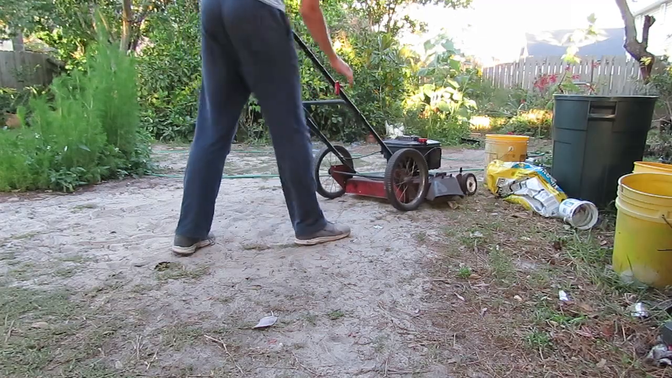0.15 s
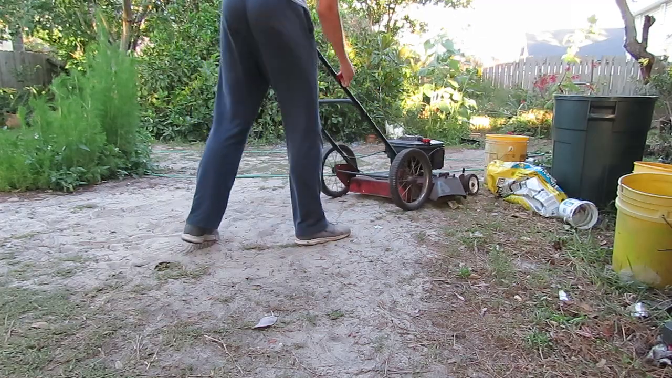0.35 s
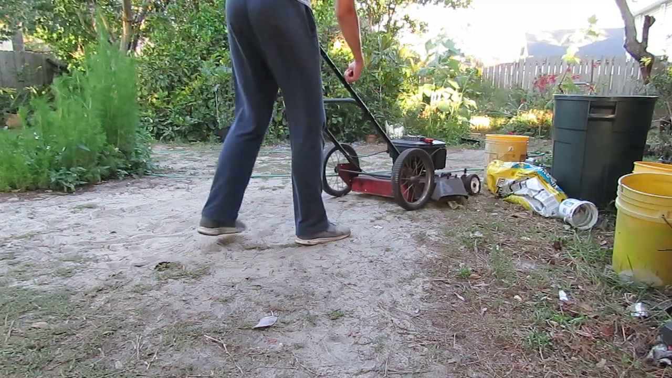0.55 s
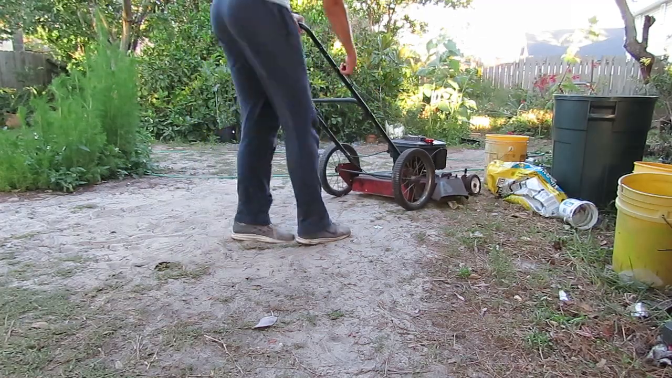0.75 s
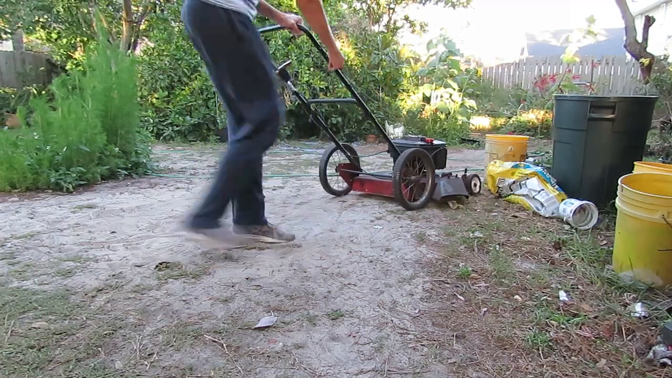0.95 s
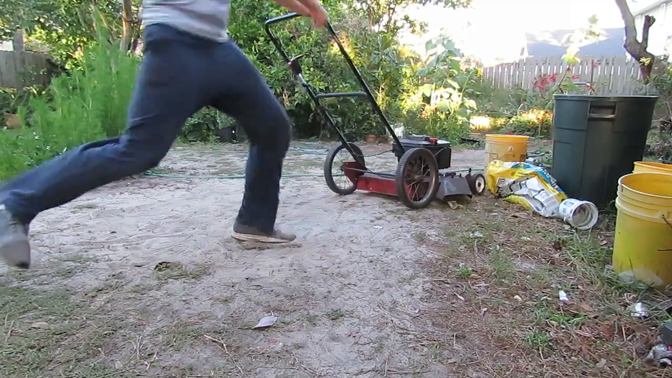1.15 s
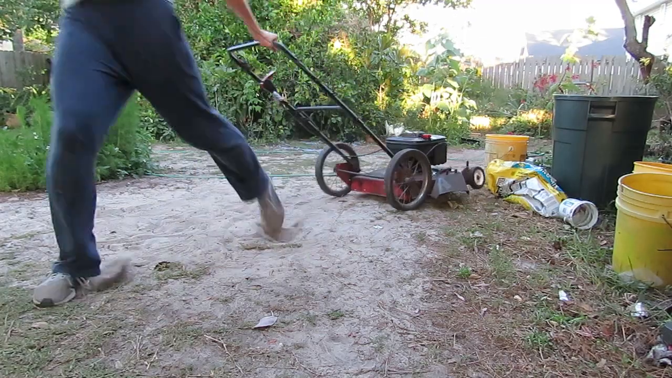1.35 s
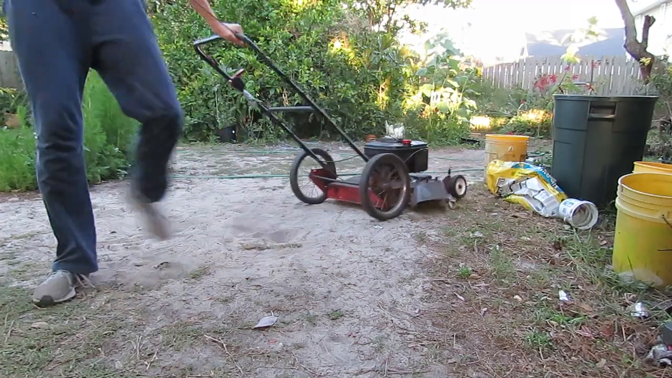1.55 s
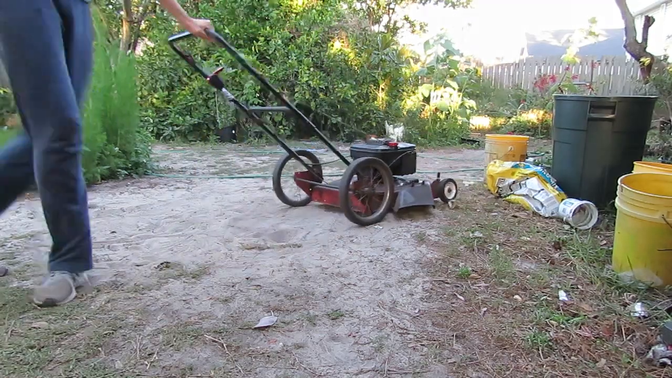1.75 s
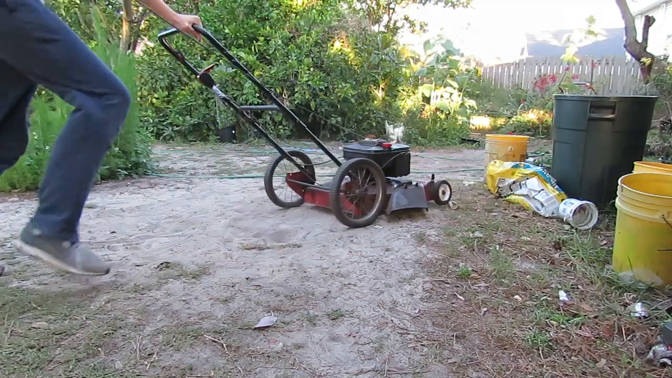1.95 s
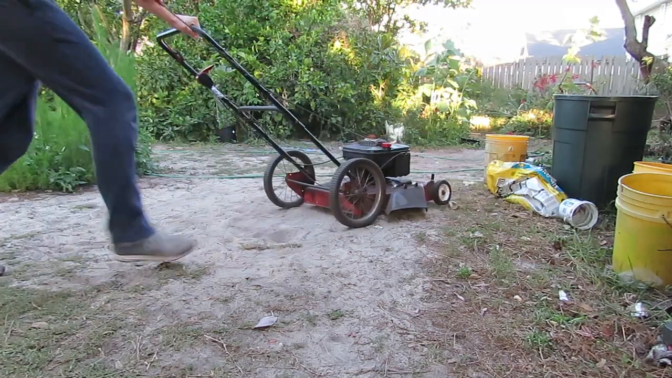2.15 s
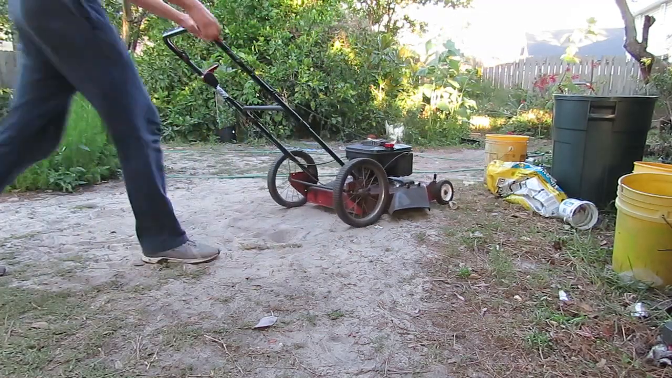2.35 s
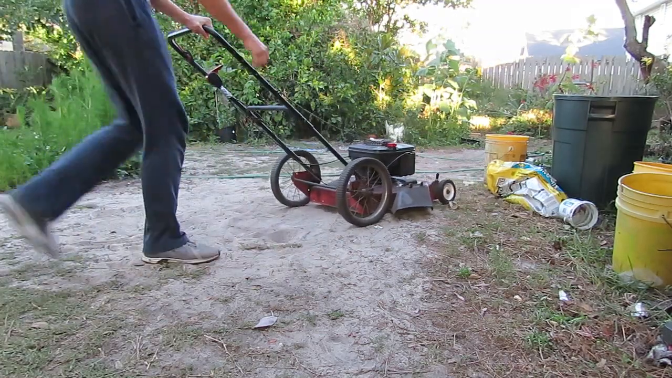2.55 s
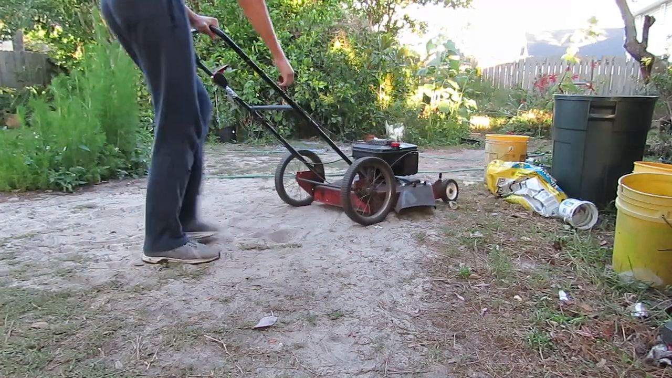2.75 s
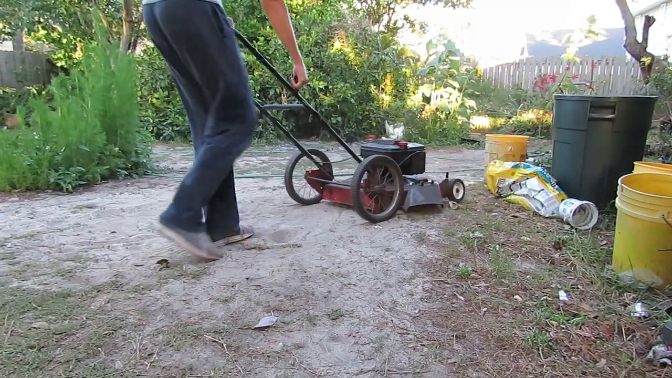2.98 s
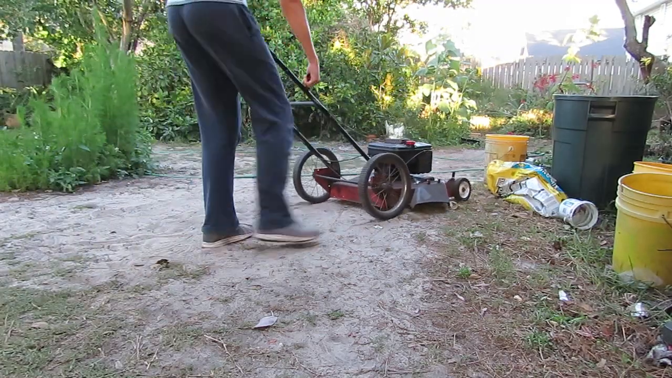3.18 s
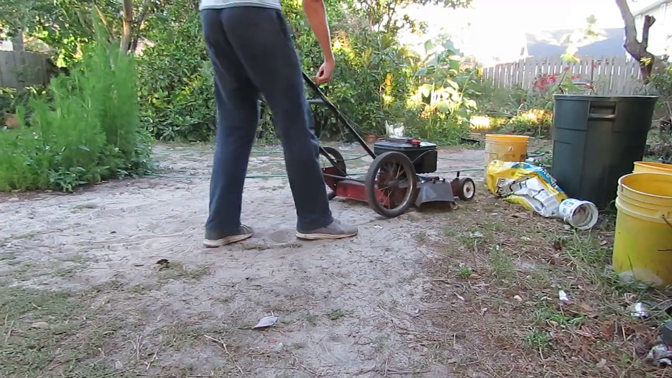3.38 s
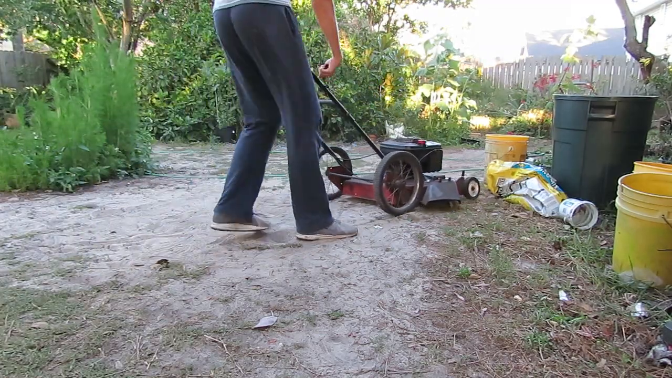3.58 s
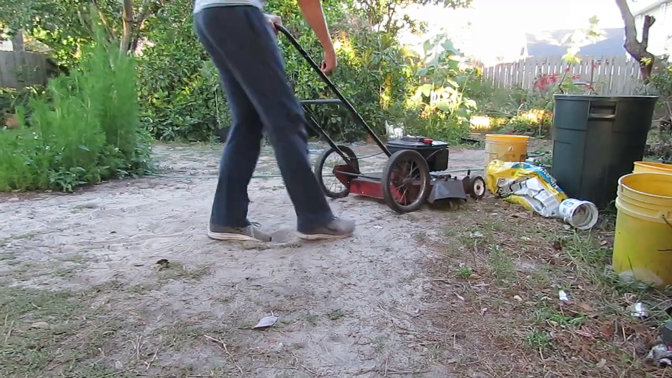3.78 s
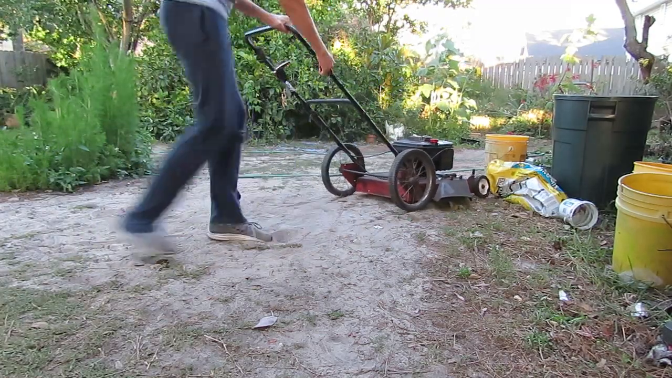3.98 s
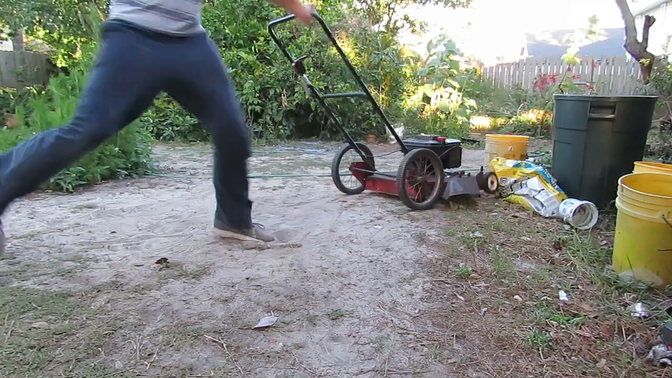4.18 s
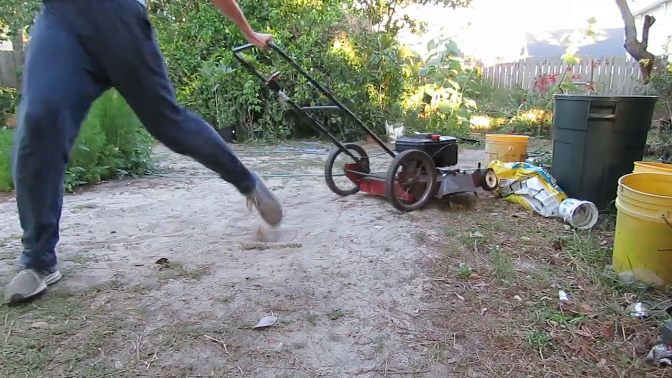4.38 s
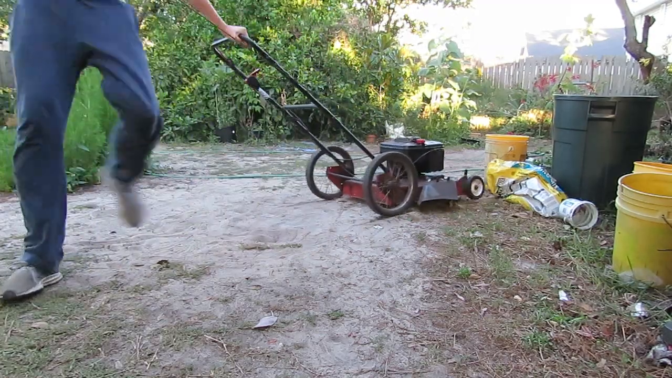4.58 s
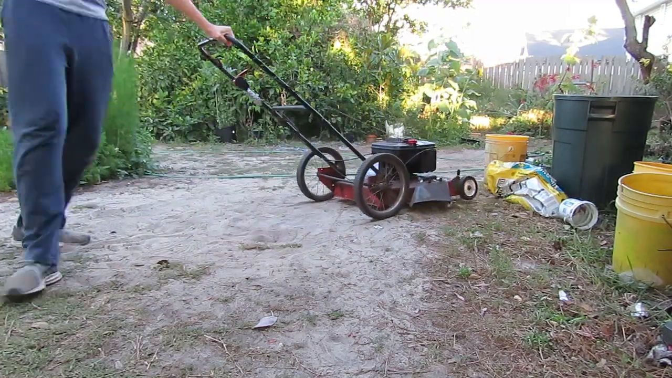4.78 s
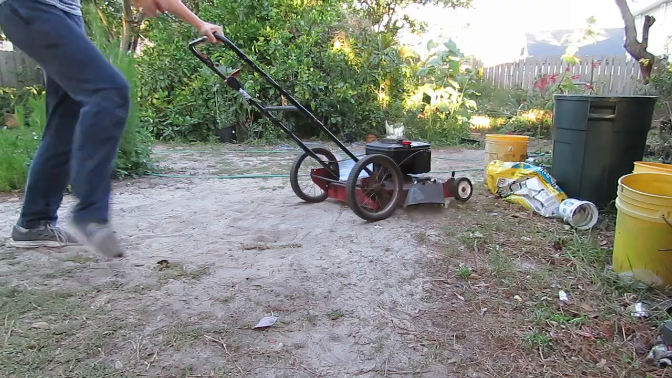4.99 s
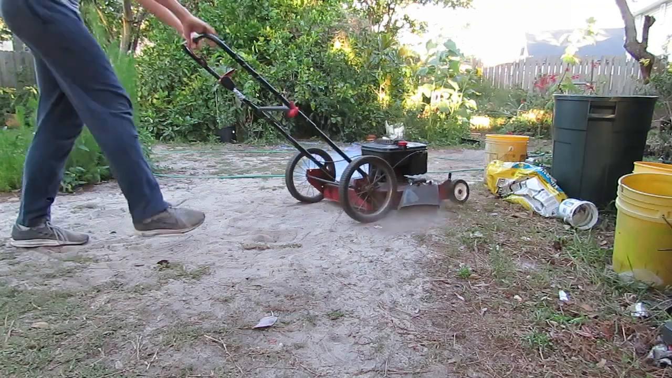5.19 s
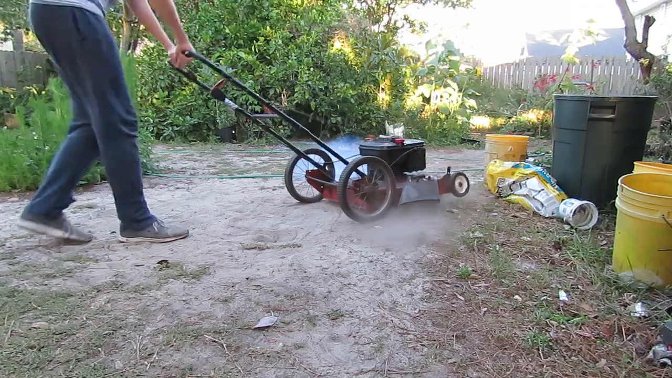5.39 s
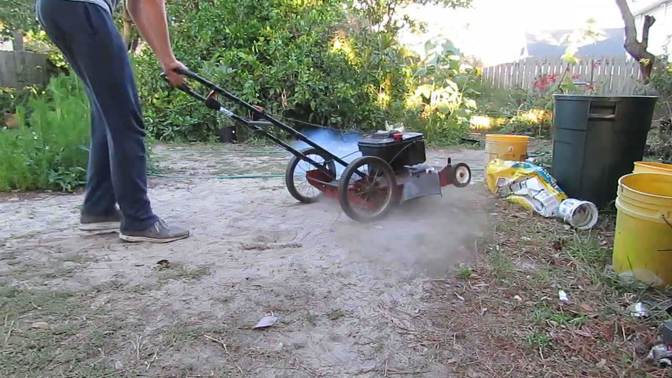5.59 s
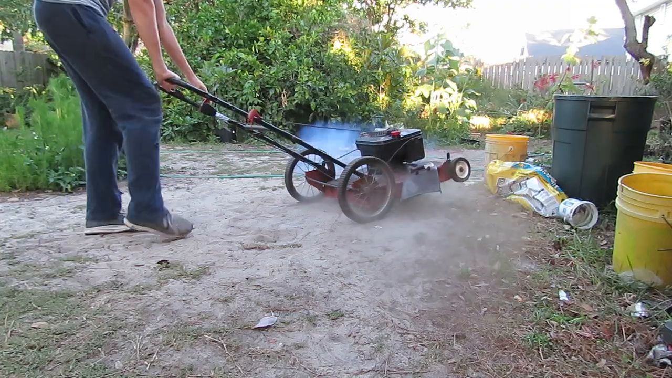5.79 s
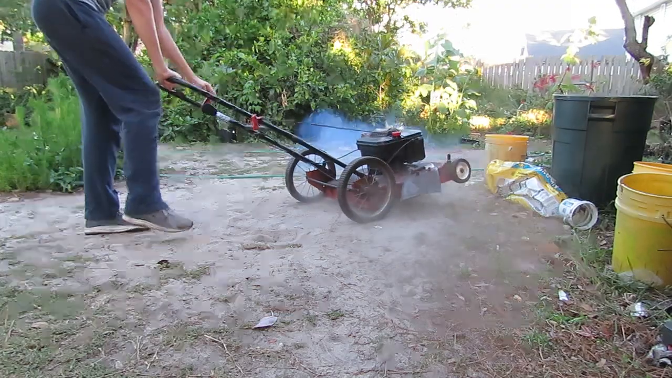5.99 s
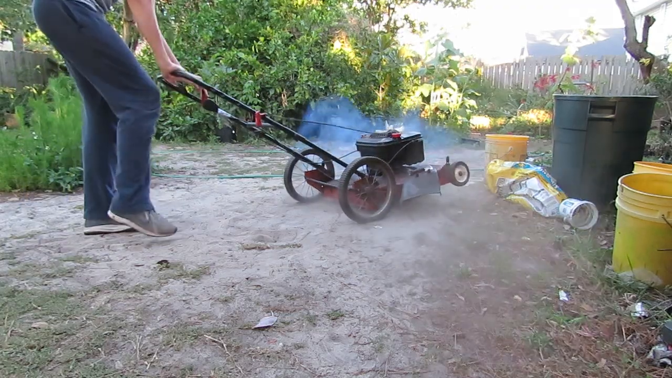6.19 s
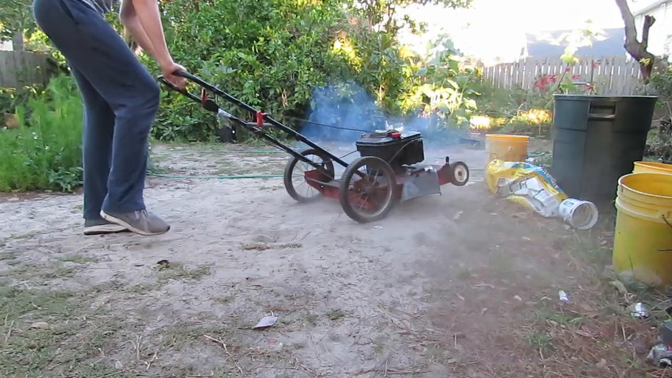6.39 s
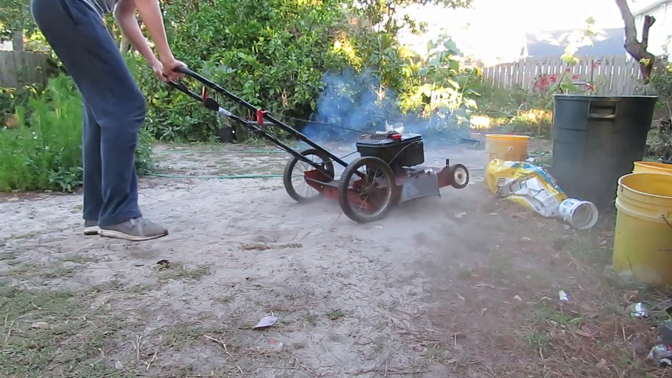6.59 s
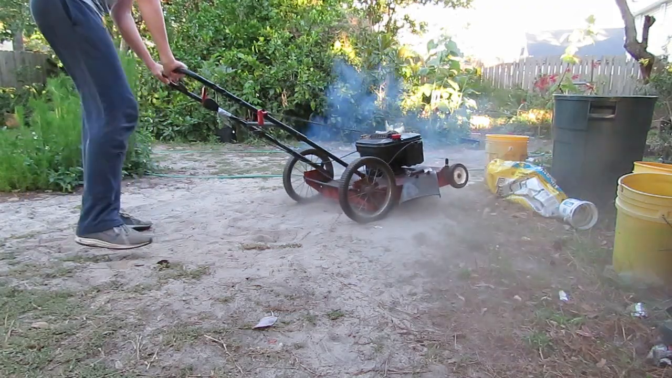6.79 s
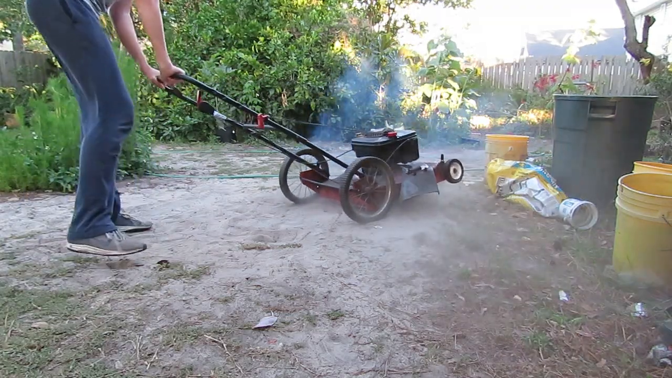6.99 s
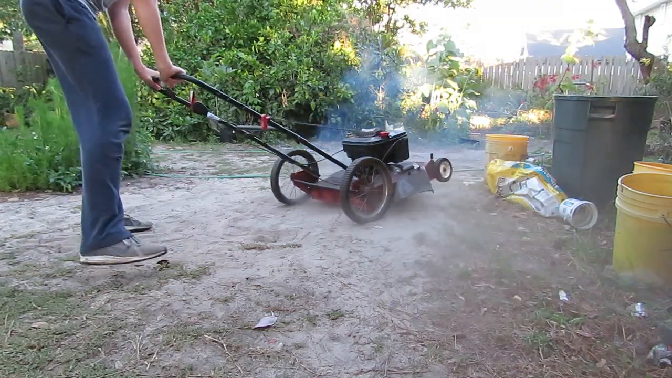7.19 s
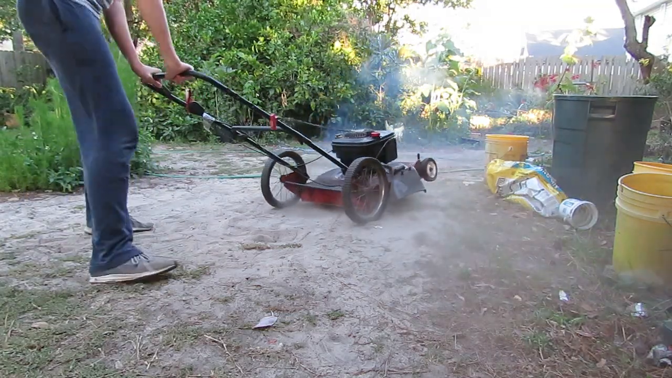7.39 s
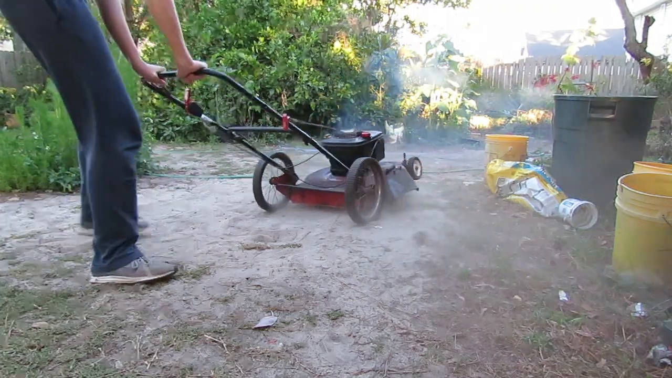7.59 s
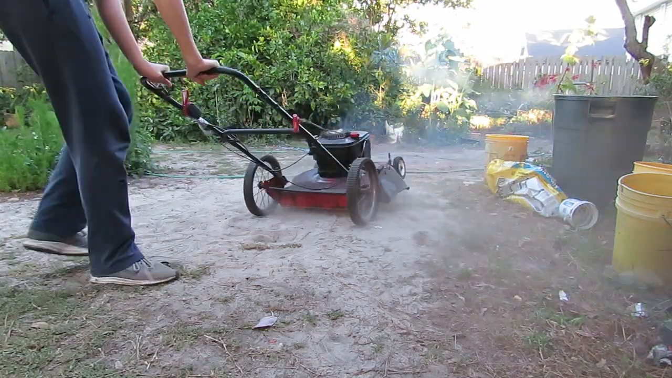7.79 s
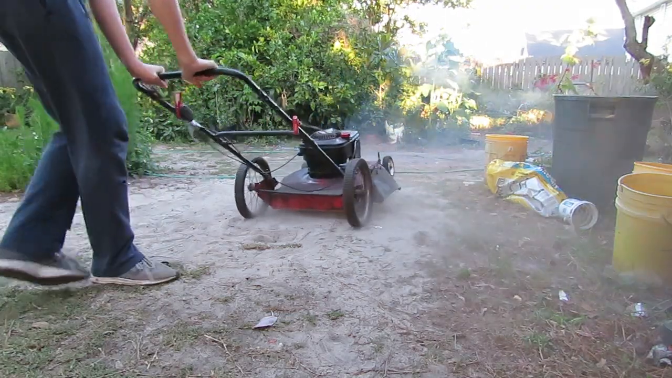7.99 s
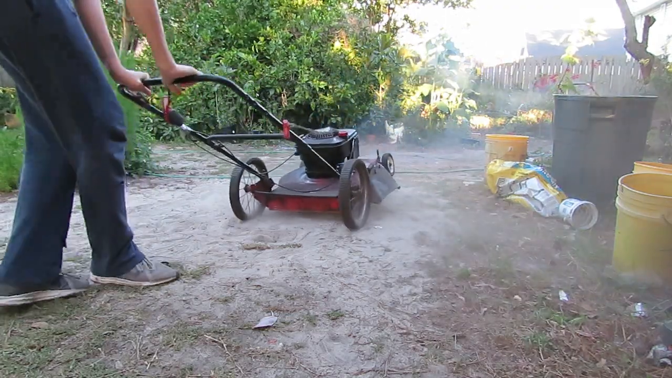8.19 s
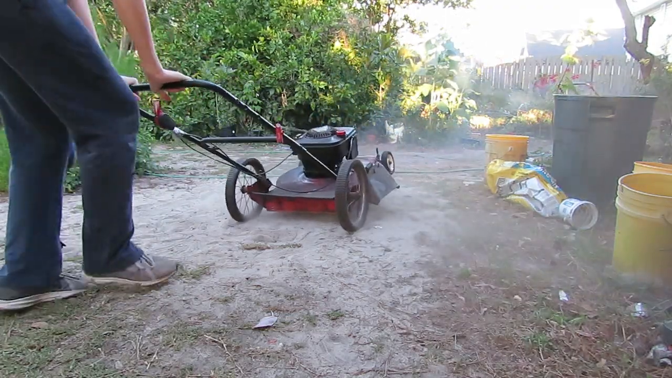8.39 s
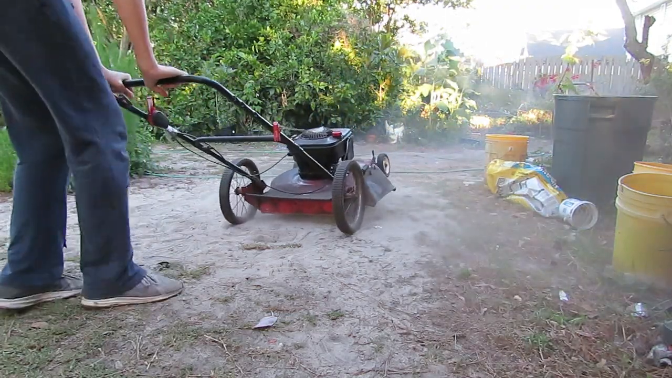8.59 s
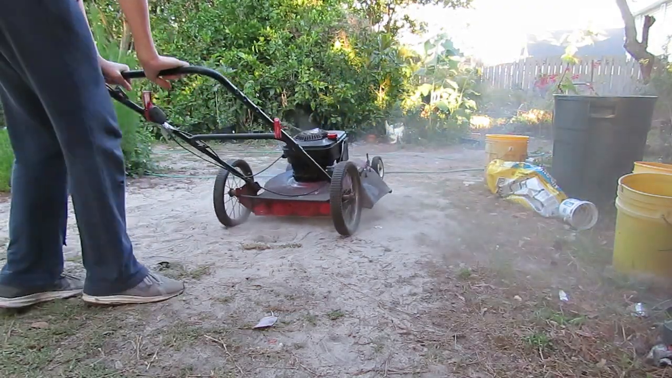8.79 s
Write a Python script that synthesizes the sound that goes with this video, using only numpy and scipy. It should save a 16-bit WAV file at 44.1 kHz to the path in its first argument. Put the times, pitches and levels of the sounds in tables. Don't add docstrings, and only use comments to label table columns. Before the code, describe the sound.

A person starts an old push mower on hard soil. The first cord pull clatters and lurches, squeaks, then winds back with ratchety rattling and loose metal slaps. After a quiet gap with handle knocks, the second pull fires the engine, slow coughing beats rushing into a harsh, steady motor roar with exhaust crackle and airy hiss. A microphone a few steps away catches dry garden sound with short reflections.

```python
import sys
import numpy as np
from scipy import signal
from scipy.fft import rfft, irfft, next_fast_len
from scipy.io import wavfile
from scipy.ndimage import uniform_filter1d

SR = 44100
rng = np.random.default_rng(int(sys.argv[2]) if len(sys.argv) > 2 else 0)


def level_to_linear(level):
    exponent = np.asarray(level, float) / 20
    return 10 ** exponent


def file_out(sig):
    cols = np.atleast_2d(sig).T
    lim = np.clip(cols, -1, 1)
    pcm = np.round(lim * 32767).astype(np.int16)
    wavfile.write(sys.argv[1], SR, pcm)


N = 390285
T = np.arange(N) / SR
CYCLE_HZ = 27.1

# (time [s], firing rate [1/s])
FIRING_RATE = [(4.74, 10.44), (4.95, 15.49), (5.2, 22.39), (5.5, 28.54), (5.65, 26.7), (5.8, 26.74),
               (6.2, 26.36), (6.6, 27.2), (7.4, 27.06), (7.75, 26.99), (8.1, 27.12), (8.85, 27.31)]
# (firing count [1], level [dB])
MISFIRES = [
    (15, -13),
    (20, -6),
    (22, -10),
]
# (time [s], load [dB], throttle opening [0-1], outlet turned away [0-1])
RUNNING = [(4.7, -1, 0.95, 0.3), (4.9, 6.5, 0, 0), (5.1, 2, 1, 0.23), (5.46, -0.5, 0.7, 0),
           (5.52, 0, 0.06, 0.2), (5.75, 2, 0, 0.08), (5.95, 0, 0.58, 0.15), (6.2, 1.5, 0.05, 0.27),
           (6.55, 2, 0.07, 0.2), (7.2, 1, 0, 0.2), (7.6, 2, 0.14, 0.57), (8.1, 1, 0, 0.46),
           (8.45, 3, 0, 0.51), (8.85, 2.5, 0, 0.63)]
# (level at rest [dB], share of load [1], change at full throttle [dB],
# change at half speed [dB], change when turned away [dB])
THUMP_LAW = (-23.5, 0.25, 2.2, -1.5, 2.4)
BASS_LAW = (8.5, -0.1, 3.5, 12, -16.5)
CRACK_LAW = (-39, 0.2, 8.5, -4.5, -11.5)
SHELL_LAW = (-7.5, 0.3, -4.5, 10.5, 7.5)
ROAR_LAW = (-24, 1, -0.5, -9.5, -0.5)
HISS_LAW = (-31.5, 1, 5.5, -5, -5.5)
DRUM_LAW = (-28.5, 1, 3.7, -4, -14)
# (multiple of the settled cycle [1], level [dB])
MUFFLER_VOICE = [(1, -37), (2, -8.5), (3, -13), (4, -7.5), (5, 2), (6, -2.5), (7, 5), (8, 1.5), (9, -1),
                 (10, 4), (11, -1), (12, -4.5), (13, -4.5), (14, -18), (15, -10.5), (16, -5.5), (20, -11.5)]
# (multiple of the cycle [1], level [dB])
BLADE_TONES = [(4, -42), (12, -38), (16, -32.5), (20, -39), (25, -43), (30, -44), (36, -46)]
# (loss at start, at end [dB])
BLADE_FADE = (7.9, 8.3), (0, 8)
# (frequency [Hz], level [dB])
CRACK_SPECTRUM = [(2000, -15), (4000, -9), (5500, -12), (7500, -11), (9300, -17.5), (11200, -5),
                  (13000, -17), (16000, -23)]
# (frequency [Hz], width [Hz], level [dB])
SHELL_MODES = [(860, 260, 12), (1720, 400, 17), (2360, 230, 16), (2980, 660, -28), (5000, 1100, -42)]
# (frequency [Hz], width [Hz], level [dB])
SHIELD_MODES = [(1460, 35, 3), (2720, 300, -18), (3240, 110, -4), (4430, 200, -3), (5230, 130, -4.5),
                (6780, 110, -11.5)]
# (frequency [Hz], density [dB per Hz])
ROAR_SPECTRUM = [(60, -42), (150, -15), (250, -11), (320, -5), (370, -9), (430, -2), (570, -7), (950, -2),
                 (1300, -3), (2000, -8), (2800, -18), (4000, -32), (8000, -70)]
# (frequency [Hz], density [dB per Hz])
HISS_SPECTRUM = [(880, -6.5), (1500, -7), (1960, 3.5), (2740, -2), (3310, 0.5), (8230, -14), (10900, -18),
                 (14300, -22), (15400, -29), (16000, -90)]

# (time [s], deck shaking [dB], cord rubbing [dB])
CORD_MOVES = [
    [(.85, -47.5, -62), (1.03, -39, -62), (1.1, -42, -76), (1.12, -38.5, -41), (1.22, -35, -58)],
    [(1.22, -40, -52), (1.32, -26.5, -41), (1.45, -18.5, -30), (1.58, -22, -33), (1.75, -27, -38.5),
     (1.92, -33.5, -38)],
    [(1.92, -31, -38), (2.04, -33.5, -37.5), (2.4, -36, -36.5), (2.54, -38.5, -43), (2.59, -41, -37),
     (2.68, -40, -55), (2.85, -59, -67)],
    [(4.17, -53, -60), (4.3, -30, -46), (4.44, -15, -30), (4.59, -24, -44), (4.69, -17.5, -32),
     (4.8, -31, -41), (4.85, -23, -36)],
]
# (time [s], level [dB], boom over rattle [dB], relative rasp [dB])
LURCHES = [(1.25, -37, 13, -22), (1.38, -20, -4, -13), (1.53, -17, -2.5, -24), (1.64, -20, 3, -24),
           (2.01, -27, 0, -12), (2.26, -25.5, -1, -21), (2.72, -50, 17, -17), (4.258, -31, 10.5, -13),
           (4.362, -20, -14, -11), (4.506, -21.5, 4.5, -3.5), (4.634, -17, 0.5, -13.5),
           (4.736, -18.5, -0.5, -23)]
# (time [s], turns [1])
PULLEY_TURNS = [(1.71, 0), (1.935, 5), (2.04, 6), (2.16, 8), (2.32, 10), (2.52, 12), (2.67, 13)]
# (frequency [Hz], width [Hz], level [dB])
DECK_MODES = [(219.5, 14, 0), (318, 27, 4.5), (450, 50, 14), (635, 117, 8.5), (910, 170, 4),
              (1300, 360, -17), (1690, 290, -11), (2320, 440, -41)]
# (frequency [Hz], density [dB per Hz])
RASP_SPECTRUM = [(1180, 2), (2000, -9), (3200, -9), (6700, -4.5), (8850, -17), (10300, -13.5), (11200, -21),
                 (13400, -16), (15300, -29), (16000, -61)]

# (time [s], level [dB], relative bright tick [dB],
# t60 [s])
LATCH_AND_HANDLE_KNOCKS = [(0.399, -34.5, -8.5, 0.33), (1.115, -42, 5.5, 0.26), (1.231, -21.5, -2.5, 0.22),
                           (1.253, -18.5, 0.5, 0.15), (2.799, -37, -4, 0.11), (2.983, -41, 2, 0.099),
                           (3.174, -36, -17, 0.22), (3.343, -25, -31, 0.33), (3.461, -17.5, -10, 0.28),
                           (3.741, -40.5, 0, 0.14), (4.096, -35.5, -0.5, 0.26), (4.171, -41, 4.5, 0.12),
                           (4.193, -20, -12.5, 0.58)]
# (time [s], level [dB], relative bright tick [dB], t60 [s])
CLANKS = [(1.337, -26, -10, .15), (1.377, -14, -15, 0.17), (1.654, -16, -24, .1), (4.323, -26, -7, 0.096),
          (4.44, -15, -25, .1), (4.471, -12, -10, .15), (4.595, -20, -23, 0.14), (1.407, -8, -13, 0.17),
          (1.619, -3.5, -15.5, 0.09), (1.776, -22, -12.5, 0.19), (1.802, -19.5, -16, 0.24),
          (1.964, -21, -6.5, 0.081), (1.995, -13.5, -25, 0.18), (2.173, -17, -20, 0.039),
          (2.212, -21.5, -11, 0.17), (2.25, -13, -30, 0.11), (2.707, -19.5, -47, 0.23),
          (2.73, -23, -36, 0.14), (4.229, -18, -8, 0.26), (4.252, -16, -5, 0.21), (4.341, -12, -23, 0.2),
          (4.426, -15.5, -6, 0.11), (4.61, -9, -13, 0.15), (4.708, -16.5, -6, 0.24)]
# (time [s], level [dB], relative bright tick [dB], t60 [s])
BUMPS = [(0.848, -31, -26, 0.087), (1.025, -40, -16, 0.17), (1.359, -27, -1, 0.2), (1.526, -20.5, 4, 0.16),
         (2.542, -35, -12, 0.16), (3.726, -40, -7, 0.13), (4.372, -21, -27, 0.22), (4.636, -13, -9, 0.16)]
# (frequency [Hz], level [dB], t60 [s])
FRAME_MODES = [(232, -0.5, 0.13), (285, -5, 0.21), (430, -19, 0.18), (595, -8, 0.35), (842, -5, 0.24),
               (984, 0.5, 0.098), (1220, 6, 0.016), (1553, -3, 0.063), (1732, -5, 0.059),
               (2230, -33, 0.029), (2510, -4, 0.048), (4860, -17, 0.019)]

# (time [s], level [dB])
PAWL_BITES = [
    (1.2535, -11),
    (4.252, -10),
]
# (frequency [Hz], level [dB], t60 [s])
PAWL_MODES = [(2800, -4, .015), (7400, -1, .005), (8700, 0, .005), (9800, 1, .005), (11200, -1, .004),
              (13000, -5, .004)]
# (time [s], level [dB])
HANDLE_DROPS = [
    (3.343, -27),
    (3.463, -29),
]
# (frequency [Hz], level [dB], t60 [s])
HANDLE_MODES = [(409, -4, .22), (614, -4, .13), (1150, -4, .15)]
# (time [s], level [dB])
BRACKET_KNOCKS = [
    (3.462, -27),
]
# (frequency [Hz], level [dB], t60 [s])
BRACKET_MODES = [(1790, 0, .08), (2680, -4, .07), (3600, -9, .05), (4900, -8, .05), (6100, -14, .04)]
# (time [s], level [dB])
HOUSING_CATCHES = [
    (1.254, -18),
    (4.253, -24),
]
# (frequency [Hz], level [dB], t60 [s])
HOUSING_MODES = [(2290, -5, .1), (2950, 0, .07), (3700, -8, .03)]
# (time [s], level [dB])
SKIRT_SLAPS = [
    (1.996, -13),
    (2.25, -15),
    (2.708, -20),
]
# (frequency [Hz], level [dB], t60 [s])
SKIRT_MODES = [(720, -5, .09), (990, 0, .1), (1600, -9, .04), (1900, -10, .04)]
# (time [s], level [dB])
PAN_BOOMS = [
    (1.24, -26),
    (1.362, -19),
    (1.505, -21),
    (2.016, -24),
    (2.287, -25),
    (4.63, -19),
]
# (frequency [Hz], level [dB], t60 [s])
PAN_MODES = [(205, 0, .2), (290, -7, .12)]

# (start [s], end [s], frequency [Hz], level [dB])
SQUEAKS = [(.4, 0.436, 6750, -53), (1.02, 1.06, 6950, -54), (1.03, 1.05, 9090, -57), (.4, .43, 8800, -60),
           (1.157, 1.19, 10535, -52), (1.95, 2.1, 10535, -64), (1.327, 1.364, 10600, -44),
           (1.43, 1.56, 10535, -58), (1.454, 1.637, 7000, -45), (1.563, 1.686, 3430, -36.5),
           (1.788, 1.95, 10500, -56), (4.197, 4.22, 10400, -36), (4.33, 4.37, 10535, -43),
           (4.472, 4.578, 3410, -36), (4.46, 4.593, 6920, -44), (4.48, 4.515, 9090, -47),
           (4.483, 4.53, 10535, -42), (4.53, 4.58, 10535, -50), (4.7, 4.84, 10535, -52),
           (4.84, 4.97, 10535, -56), (4.97, 8.853, 10535, -59)]
# (time [s], level [dB])
SOIL_THUDS = [(.43, -45), (1.36, -30), (1.83, -35), (2.03, -40), (2.3, -40), (3.09, -51), (4.37, -37),
              (4.5, -33), (4.64, -27)]
# (frequency [Hz], density [dB per Hz])
YARD_SPECTRUM = [(15, -62), (25, -17), (117, -8.5), (263, -9), (285, -8), (624, -7.5), (862, -6),
                 (1040, -10), (1520, -13.5), (2050, -21), (2610, -23.5), (6730, -38.5), (11900, -48),
                 (16000, -51)]
# (frequency [Hz], side minus mid [dB])
STEREO_WIDTH = [(40, -71), (120, -89), (250, -26), (500, -17.5), (1000, -18.5), (2000, -14), (4000, -12),
                (8000, -2), (11000, -5.5), (14000, 0.5)]


def engine():
    s, per_s = np.transpose(FIRING_RATE)
    rate = np.interp(T, s, per_s)
    started = T >= s[0]
    phase = np.where(started, np.cumsum(rate * started) / SR, -1)
    thump, bass, crack, shell, roar, hiss, drumming = layer_gains(rate)
    fired = np.flatnonzero(np.diff(np.floor(phase)) == 1)
    first = fired[0]
    luck = rng.standard_normal((len(fired), 2))
    miss_db = np.zeros(len(fired))
    for count, db in MISFIRES:
        miss_db[round(count)] = db
    blows, spits = np.zeros(N), np.zeros(N)
    blows[fired] = level_to_linear(1.4 * luck[:, 0] + miss_db)
    spits[fired] = level_to_linear(1.8 * np.clip(luck[:, 1], -2, .8) + .8 * miss_db)

    thumps = muffler_thumps(blows, bass)
    hum = blade_hum(phase, s[0])
    cracks = exhaust_cracks(phase, spits, shell, len(fired))
    clatter = valve_clatter(phase)
    body = colour(grit(1.2, 2500), ROAR_SPECTRUM) * level_to_linear(1.1 * wander(5.4) + 1.0 * wander(43.0))
    body = body + .5 * clatter / np.std(clatter[first:])
    drum = deck_drumming()
    breath_db = 0.75 * np.cos(2 * np.pi * (phase - .2))
    air = colour(grit(2.7, 5000), HISS_SPECTRUM) * level_to_linear(1.6 * wander(25.) + breath_db)
    return (thump * thumps / np.std(thumps[first:]) + hum + drumming * drum
            + 0.85 * crack * cracks + roar * body + hiss * air)


def layer_gains(rate):
    s, *controls = np.transpose(RUNNING)
    load_db, throttle, away = (np.interp(T, s, c) for c in controls)
    lag = 2 * np.clip(1 - rate / CYCLE_HZ, 0, 1)
    gate = np.clip((T - s[0]) / .02, 0, 1)
    gains = []
    for law in (THUMP_LAW, BASS_LAW, CRACK_LAW, SHELL_LAW, ROAR_LAW, HISS_LAW, DRUM_LAW):
        db, share, open_db, lag_db, away_db = law
        gains.append(gate * level_to_linear(db + share * load_db + open_db * throttle + lag_db * lag + away_db * away))
    return gains


def muffler_thumps(blows, bass):
    hz = np.fft.rfftfreq(8192, 1 / SR)
    voice = [(k * CYCLE_HZ, db) for k, db in MUFFLER_VOICE]
    voice += [(750, -14.0), (1300, -34), (3000, -26), (9000, -90)]
    turn = 2.7 * np.exp(-(hz / 165) ** 2) - .5 + hz / 1500
    wave = np.fft.fftshift(irfft(level_to_linear(read(voice, hz)) * np.exp(1j * turn)))
    thumps = signal.oaconvolve(blows, wave, "same")
    low = signal.sosfiltfilt(signal.butter(1, [68, 125], "bandpass", fs=SR, output="sos"), thumps)
    deep = signal.sosfiltfilt(signal.butter(2, 68, fs=SR, output="sos"), thumps)
    tipped_db = -15 * np.clip((5.8 - T) / .04, 0, 1)
    thumps = thumps + (bass * level_to_linear(0.7 * tipped_db) - 1) * low + (level_to_linear(tipped_db) - 1) * deep
    upper = signal.sosfiltfilt(signal.butter(1, [250, 380], "bandpass", fs=SR, output="sos"), thumps)
    return thumps + (1.14 / (bass + .01) ** 0.76 - 1) * upper * (bass > 0)


def exhaust_cracks(phase, spits, shell, firings):
    u = np.arange(900) / SR
    jet = np.exp(-u / .0019) * np.minimum(u / .0015, 1) * 1.1
    jet = jet + .15 * np.exp(-u / .006) + .42 * np.exp(-((u - .0085) / .0015) ** 2)
    chuff = np.exp(-((u - .005) / .0032) ** 2) + .3 * np.exp(-abs(u - .008) / .006)
    slow = np.clip(1.15 - uniform_filter1d(np.gradient(phase), 3000) * SR / CYCLE_HZ, .12, 1)
    flow = np.roll(signal.oaconvolve(spits, jet)[:N], -45)
    flow = flow + 1.85 * np.roll(signal.oaconvolve(spits * slow, chuff)[:N], -200)
    opened = np.diff(np.floor(phase + 0.17), prepend=0) == 1
    lifts = opened * 6 * slow * level_to_linear(-13.5 + 3.5 * rng.standard_normal(N).clip(-2, 1))
    lifted = signal.oaconvolve(lifts, np.exp(-u / 0.0074))[:N]
    gas = flow * evened(grit(2.5, 6000))
    jolt = gas + 0.98 * lifted * rng.standard_normal(N)
    firing = np.floor(phase + .3).astype(int)
    tint_db = 1.8 * rng.standard_normal((firings + 1, len(SHELL_MODES)))
    shake_db = 4 * rng.standard_normal((firings + 1, len(SHIELD_MODES))).clip(-2, 1.3)
    shell_ring = jolted(jolt, SHELL_MODES, tint_db[firing].T)
    shield = jolted(jolt, SHIELD_MODES, shake_db[firing].T)
    return level_to_linear(1) * evened(shield) + colour(gas, CRACK_SPECTRUM) + shell * level_to_linear(9.0) * evened(shell_ring)


def jolted(jolt, modes, tints_db):
    out = np.zeros(N)
    for (hz, width, db), tint_db in zip(modes, tints_db):
        out += ring(level_to_linear(db + tint_db) * jolt, hz, width) / np.sqrt(width)
    return out


def valve_clatter(phase):
    places, sizes = rng.random(24), rng.standard_normal(24)
    ticks = np.zeros(N)
    for place, size in zip(places, sizes):
        ticks[1:] += size * (np.diff(np.floor(phase - place)) == 1)
    ticks *= 1 + .55 * rng.standard_normal(N)
    ringing = ring(ticks, 880, 200.0) + .5 * ring(ticks, 1480, 310.0) + 0.38 * ring(ticks, 600, 240.0)
    return band(ringing, 400, 2200)


def deck_drumming():
    shake = grit(2.1, 860)
    lower = ring(ring(shake, 297, 75.0), 297, 75.0)
    return evened(lower + ring(ring(shake, 425, 62.0), 425, 62.0))


def blade_hum(phase, start_s):
    turns = uniform_filter1d(phase, 6000)
    speed = np.clip(np.gradient(turns) * SR / CYCLE_HZ, 0, 1) ** 5 * (T > start_s + .1)
    hum = np.zeros(N)
    for k, db in BLADE_TONES:
        level = level_to_linear(db + 2.2 * wander(4.) - np.interp(T, *BLADE_FADE))
        hum += level * np.sqrt(2) * np.cos(2 * np.pi * (round(k) * turns + rng.random()))
    return speed * hum


def pulls():
    shake, rub = np.sum([curves(rows) for rows in CORD_MOVES], axis=0)
    s, db, boom_db, rasp_db = np.transpose(LURCHES)
    lurch = [swells(s, db + relative_db, 333, 170) for relative_db in (boom_db, 0, rasp_db)]
    boom, rattle, rasp = np.hypot([shake * level_to_linear(-1), shake, rub], lurch)
    shaken = deck(grit(2.7, 1500))
    turns = np.interp(T, *np.transpose(PULLEY_TURNS), left=.5, right=.5)
    throb = level_to_linear(1.6 * wander(14.) - 9 * np.cos(np.pi * turns) ** 6)
    low = boom * band(shaken, 106, 442) * level_to_linear(3.2 * wander(18.0))
    loose = shaken + .5 * evened(grit(2.5, 900))
    mid = rattle * band(loose, 520, 2600) * level_to_linear(2.2 * wander(30.))
    return low + mid + rasp * colour(grit(2.5, 4000), RASP_SPECTRUM) * throb


def knocks():
    body, tick, thud, rings = np.zeros((4, N))
    kinds = (LATCH_AND_HANDLE_KNOCKS, -21), (CLANKS, -25), (BUMPS, -4.5)
    rows = sorted((*row, thud_db) for table, thud_db in kinds for row in table)
    luck = rng.standard_normal((len(rows), 2, len(FRAME_MODES)))
    f, mode_db, mode_t60 = np.transpose(FRAME_MODES)[:, :, None]
    u = np.arange(9000) / SR
    rise = np.minimum(u / 0.00046, 1)
    snap = np.minimum(u / 0.00035, 1)
    for (s, db, tick_db, t60, thud_db), (tune, share) in zip(rows, luck[..., None]):
        i = round(s * SR)
        span = slice(i, i + len(u))
        fall = -60 * u / max(t60, .02)
        body[span] += level_to_linear(db + fall) * rise
        tick[span] += level_to_linear(db + tick_db) * (level_to_linear(2.6 * fall) + 0.095 * level_to_linear(fall)) * snap
        thud[span] += level_to_linear(db + thud_db + 3.1 * fall) * np.minimum(u / 0.00083, 1)
        tilt_db = np.where(f < 400, thud_db + 15.0, np.where(f > 3000, tick_db + 21, 0))
        level = level_to_linear(db + mode_db + tilt_db + 2.5 * share + fall * 0.15 / mode_t60)
        modes = level * np.sin(2 * np.pi * f * (1 + 0.0412 * tune) * u)
        rings[span] += modes.sum(0) * rise
    shaken = deck(rng.standard_normal(N))
    bright_spectrum = [(1500, 7), (3000, 10), (6000, 1.0), (10000, -2.5), (15000, -16)]
    bright = colour(rng.standard_normal(N), bright_spectrum)
    dull = body * band(shaken, 610, 1920) + thud * band(shaken, 59, 610)
    return 0.38 * dull + 1.12 * tick * bright + 0.37 * rings


def struck(hits, modes):
    u, out = np.arange(12000) / SR, np.zeros(N)
    for s, hit_db in hits:
        ringing = sum(level_to_linear(hit_db + db - 60 * u / t60) * np.sin(2 * np.pi * hz * u) for hz, db, t60 in modes)
        contact = rng.standard_normal(60) * np.exp(-np.arange(60) / 1.5)
        contact = contact / np.linalg.norm(contact)
        out[round(s * SR):][:len(u)] += signal.oaconvolve(ringing, contact)[:len(u)]
    return out


def squeaks():
    out, waver, flutter = np.zeros(N), wander(90.0), wander(60.)
    for start, end, hz, db in SQUEAKS:
        i = slice(round(start * SR), round(end * SR))
        tone = np.sqrt(2) * np.sin(2 * np.pi * np.cumsum(hz * (1 + 0.0018 * waver[i])) / SR)
        fade = np.clip(np.minimum(T[i] - start, end - T[i]) / .008, 0, 1)
        out[i] += level_to_linear(db + 3.0 * flutter[i]) * tone * fade
    return out


def ground():
    s, db = np.transpose(SOIL_THUDS)
    level = swells(s, db, 311, 252) + level_to_linear(-78)
    return level * band(band(rng.standard_normal(N), 75, 152), 75, 152)


def echoes(x, t60, first_s):
    u = np.arange(round(.3 * SR)) / SR
    taps = rng.standard_normal(len(u)) * (rng.random(len(u)) < 2000 / SR)
    taps = taps * level_to_linear(-60 * u / t60) * (u > first_s)
    treble = signal.sosfilt(signal.butter(2, 450, "highpass", fs=SR, output="sos"), x)
    return signal.oaconvolve(treble, taps / np.linalg.norm(taps))[:N]


def yard():
    return level_to_linear(-39 + 0.18 * wander(10.0)) * colour(rng.standard_normal(N), YARD_SPECTRUM)


def evened(x):
    return x / np.sqrt(np.mean(x ** 2) + 1e-20)


def read(points, hz):
    f, value = np.transpose(points)
    return np.interp(np.log(hz + 1), np.log(f + 1), value)


def colour(x, points):
    size = next_fast_len(len(x))
    gain = level_to_linear(read(points, np.fft.rfftfreq(size, 1 / SR)))
    return evened(irfft(rfft(x, size) * gain, size)[:len(x)])


def band(x, lo_hz, hi_hz):
    sos = signal.butter(2, [lo_hz, min(hi_hz, SR * .45)], "bandpass", fs=SR, output="sos")
    return evened(signal.sosfilt(sos, x))


def ring(x, hz, width):
    r = np.exp(-np.pi * width / SR)
    return signal.lfilter([1 - r, 0, r - 1], [1, -2 * r * np.cos(2 * np.pi * hz / SR), r * r], x)


def deck(x):
    return evened(sum(level_to_linear(db) * ring(x, hz, width) / np.sqrt(width) for hz, width, db in DECK_MODES))


def grit(spread_db, per_s):
    sizes = level_to_linear(spread_db * np.minimum(rng.exponential(1, N), 5))
    return rng.standard_normal(N) * (0.53 + sizes * (rng.random(N) < per_s / SR))


def wander(hz):
    count = int(N / SR * 400) + 2
    slow = signal.lfilter([1], [1, -np.exp(-2 * np.pi * hz / 400)], rng.standard_normal(count))
    return np.interp(T * 400, np.arange(count), evened(slow))


def curves(rows):
    s, *columns = np.transpose(rows)
    gate = np.clip(np.minimum(T - s[0], s[-1] + .02 - T) / .02, 0, 1)
    return [gate * level_to_linear(np.interp(T, s, c)) for c in columns]


def swells(times, levels_db, rise_db_per_s, fall_db_per_s):
    step = T[::32]
    gap = step - np.asarray(times)[:, None]
    loss_db = np.maximum(-rise_db_per_s * gap, fall_db_per_s * gap)
    gains = level_to_linear(np.asarray(levels_db)[:, None] - loss_db)
    return np.interp(T, step, np.sqrt((gains ** 2).sum(0)))


def scene():
    mower = engine() + pulls() + knocks() + squeaks() + ground()
    mower = mower + struck(PAWL_BITES, PAWL_MODES) + struck(HANDLE_DROPS, HANDLE_MODES)
    mower = mower + struck(BRACKET_KNOCKS, BRACKET_MODES) + struck(HOUSING_CATCHES, HOUSING_MODES)
    mower = mower + struck(SKIRT_SLAPS, SKIRT_MODES) + struck(PAN_BOOMS, PAN_MODES)
    mid = mower + level_to_linear(-11) * echoes(mower, 0.22, .006) + yard()
    hz, _, z = signal.stft(mid, SR, nperseg=256)
    scattered = z * np.exp(2j * np.pi * rng.random(z.shape)) * level_to_linear(read(STEREO_WIDTH, hz) + 1.0)[:, None]
    port_lag_s = 9e-6
    scattered = scattered - 1j * np.tan(np.pi * hz * port_lag_s)[:, None] * z
    side = signal.istft(scattered, SR, nperseg=256)[1][:N]
    side = signal.sosfilt(signal.butter(1, 150, "highpass", fs=SR, output="sos"), side)
    return np.array([mid + side, mid - side])


def top_cut(x):
    return signal.sosfilt(signal.butter(12, 16130, fs=SR, output="sos"), x)


def record(dry):
    heard = signal.sosfiltfilt(signal.butter(2, 50, "highpass", fs=SR, output="sos"), dry)
    heard = np.tanh(heard)
    heard = signal.sosfiltfilt(signal.butter(10, 15200, fs=SR, output="sos"), heard)
    return top_cut(heard)


dry = scene()
out = record(dry)
file_out(out)
```